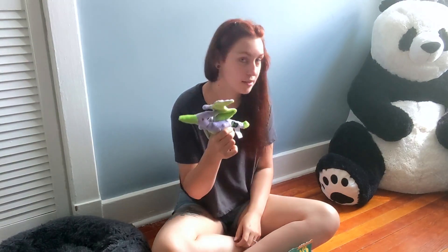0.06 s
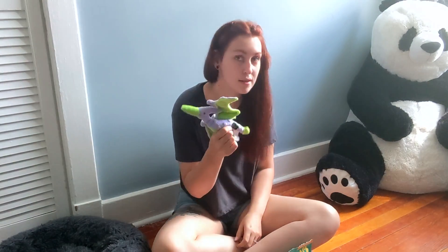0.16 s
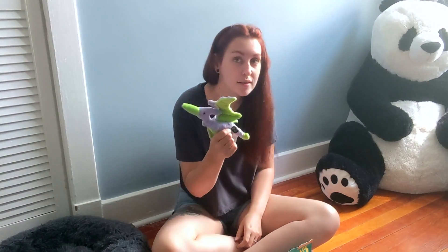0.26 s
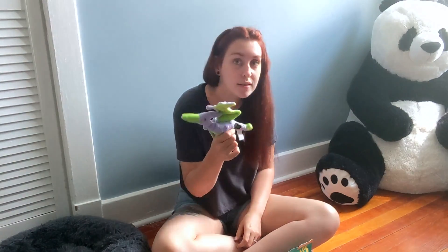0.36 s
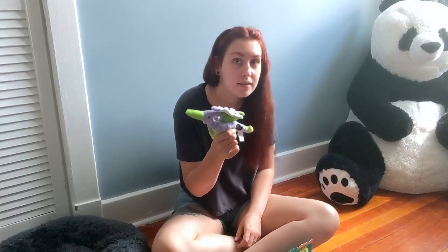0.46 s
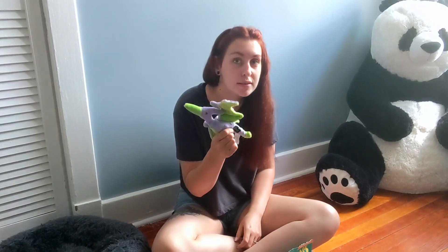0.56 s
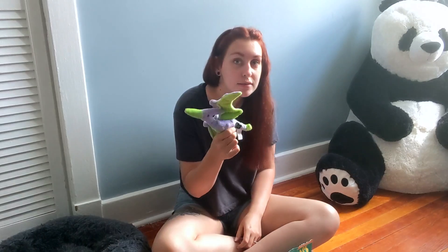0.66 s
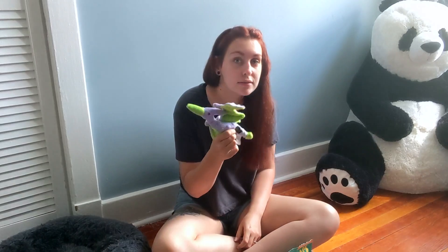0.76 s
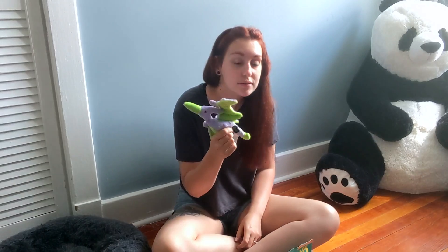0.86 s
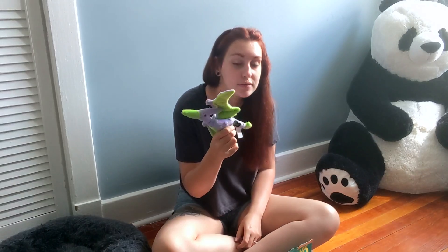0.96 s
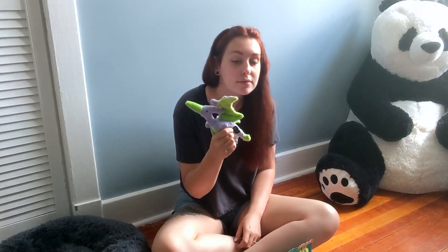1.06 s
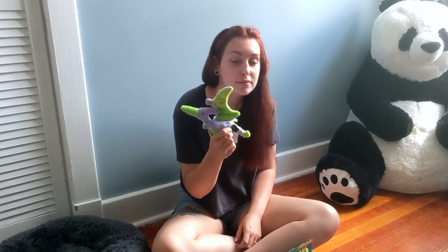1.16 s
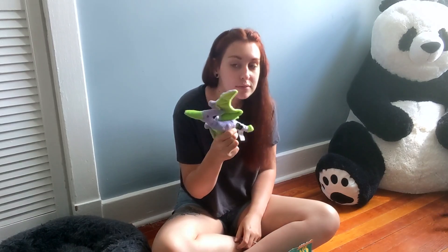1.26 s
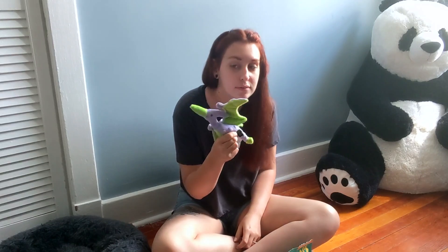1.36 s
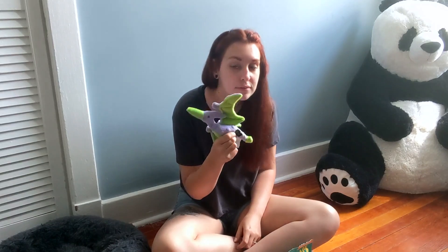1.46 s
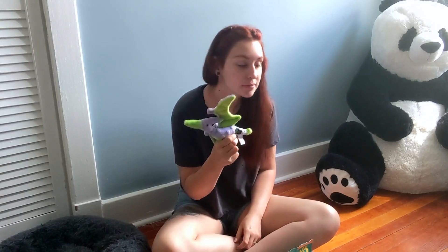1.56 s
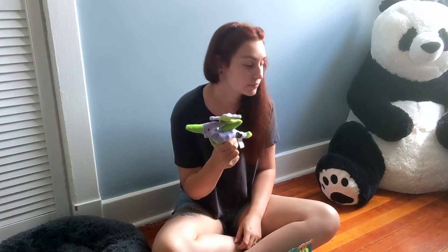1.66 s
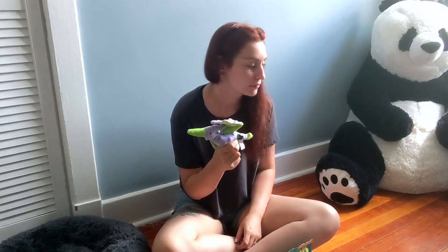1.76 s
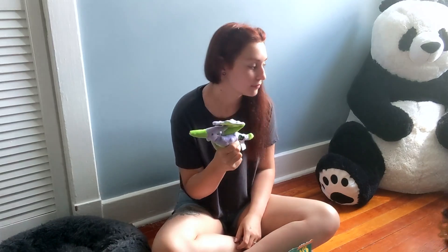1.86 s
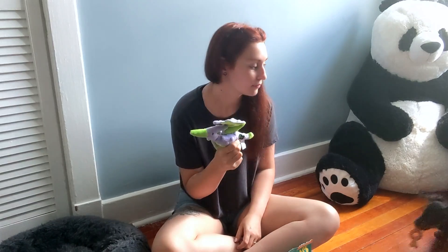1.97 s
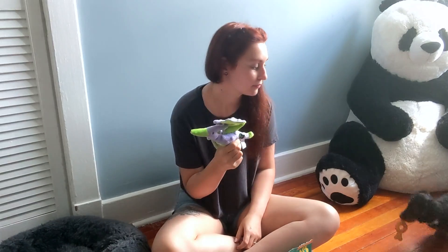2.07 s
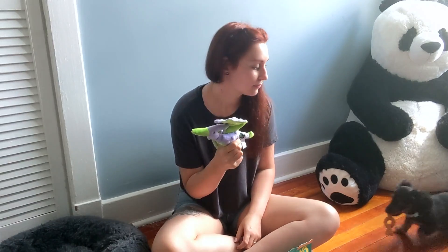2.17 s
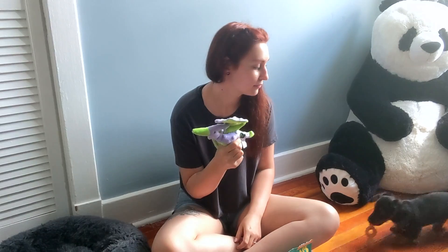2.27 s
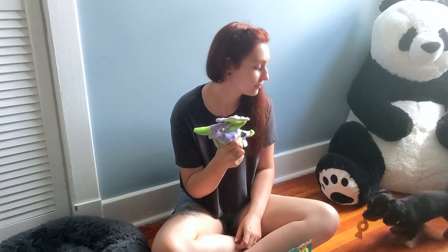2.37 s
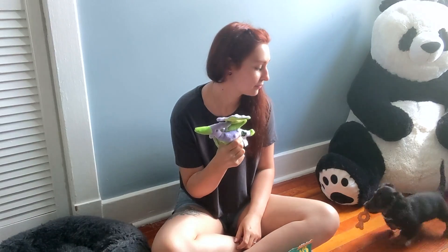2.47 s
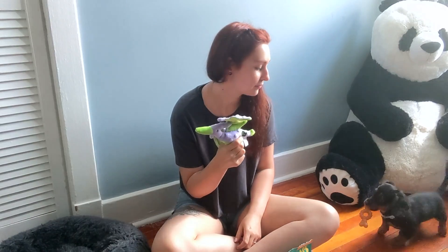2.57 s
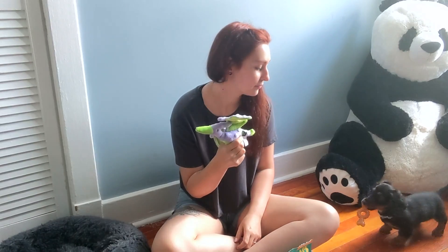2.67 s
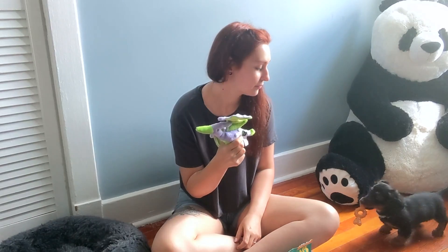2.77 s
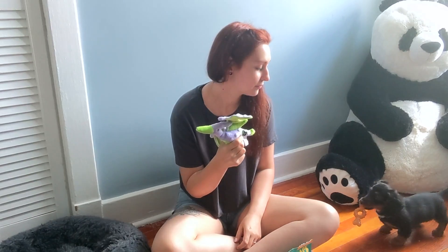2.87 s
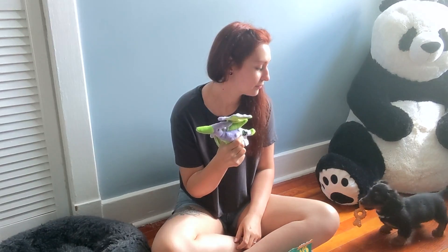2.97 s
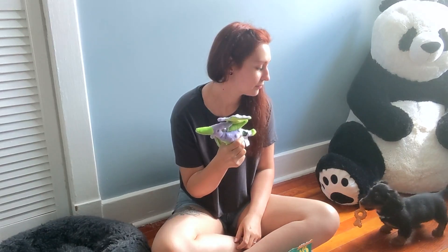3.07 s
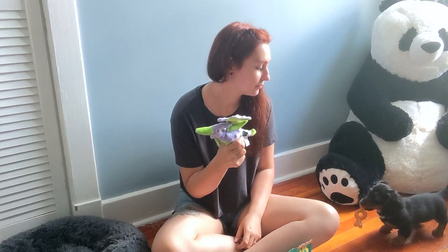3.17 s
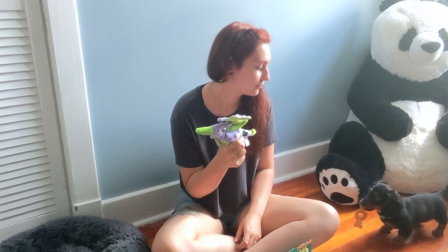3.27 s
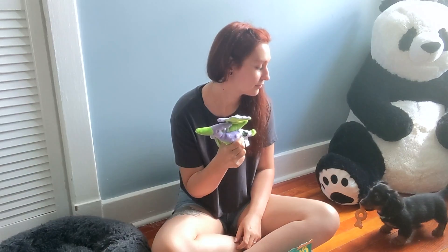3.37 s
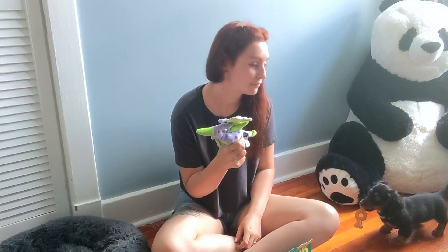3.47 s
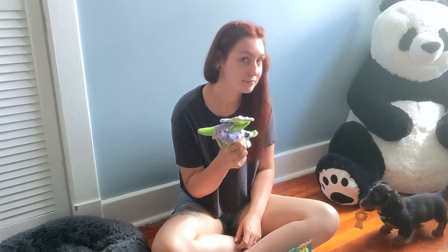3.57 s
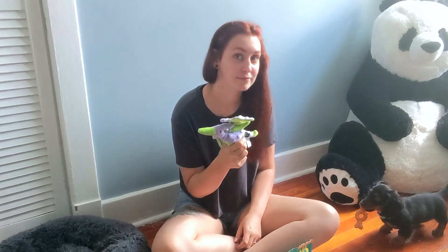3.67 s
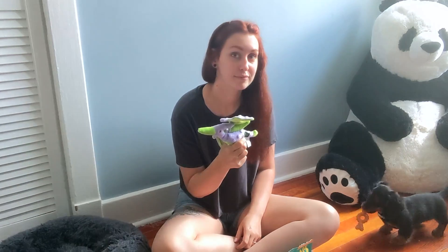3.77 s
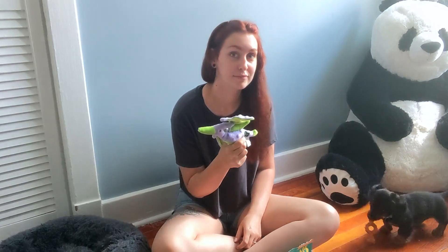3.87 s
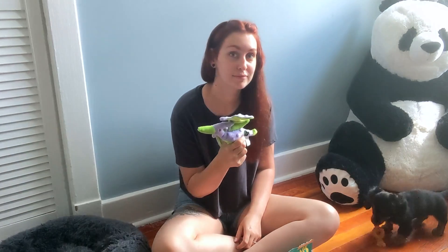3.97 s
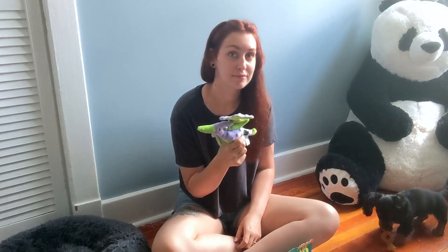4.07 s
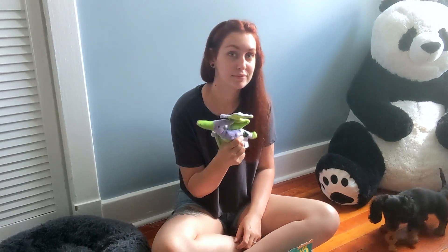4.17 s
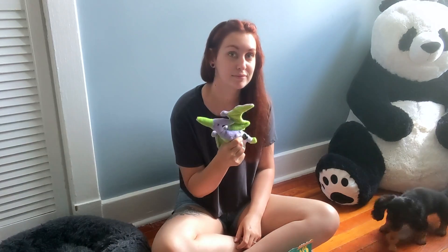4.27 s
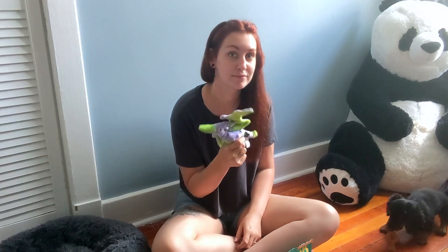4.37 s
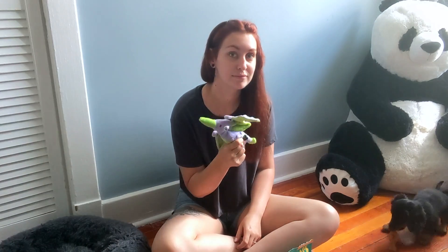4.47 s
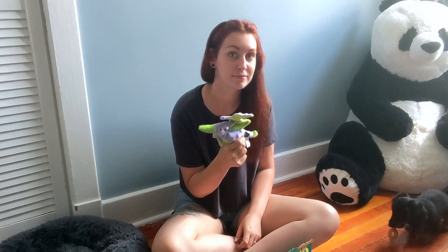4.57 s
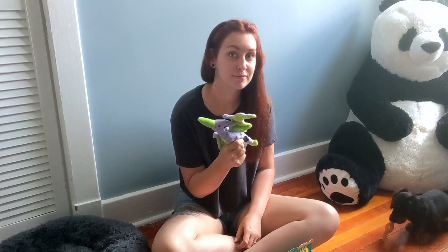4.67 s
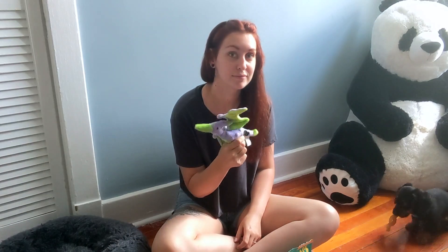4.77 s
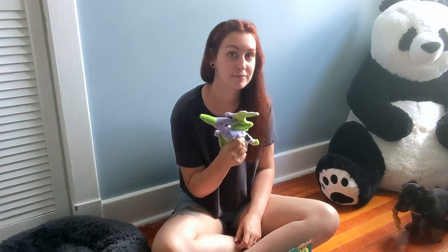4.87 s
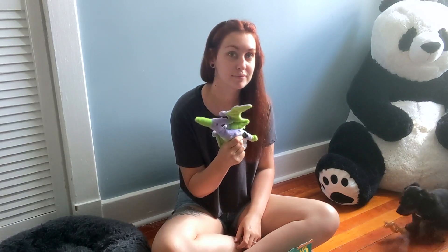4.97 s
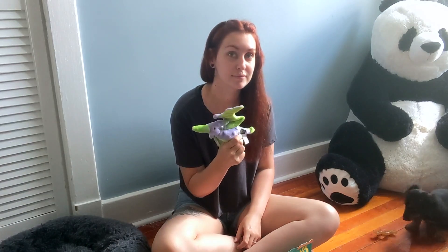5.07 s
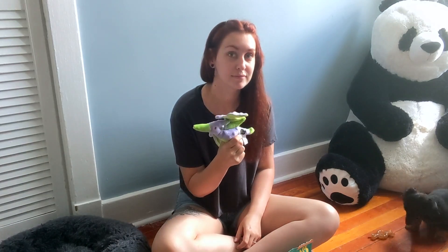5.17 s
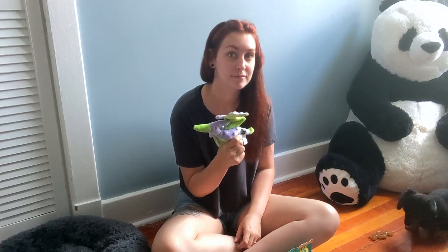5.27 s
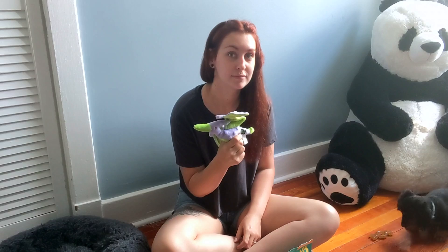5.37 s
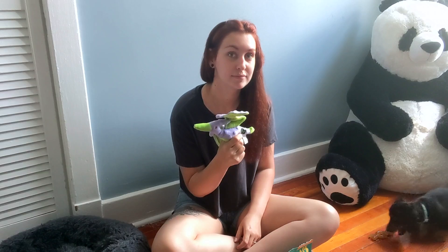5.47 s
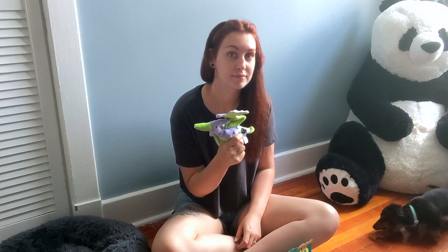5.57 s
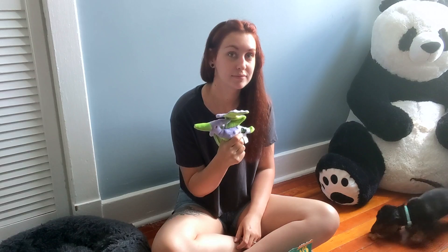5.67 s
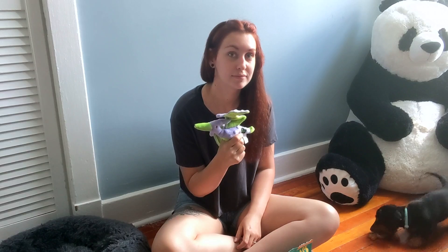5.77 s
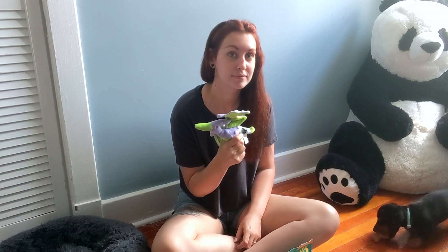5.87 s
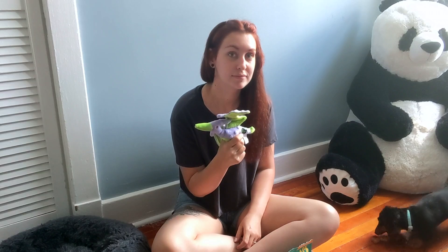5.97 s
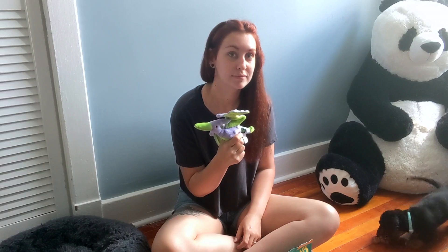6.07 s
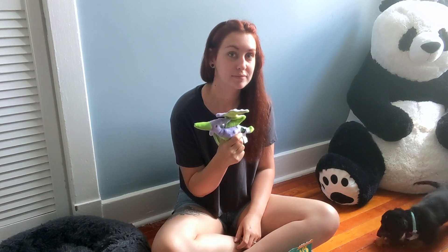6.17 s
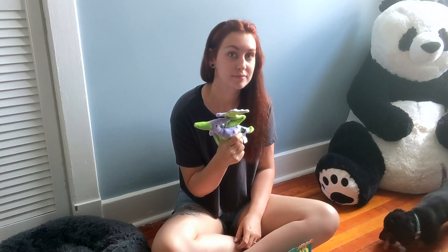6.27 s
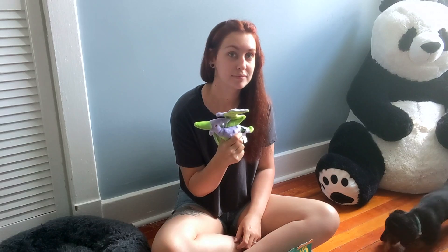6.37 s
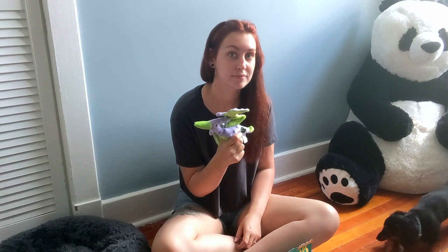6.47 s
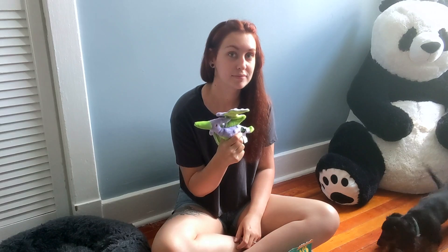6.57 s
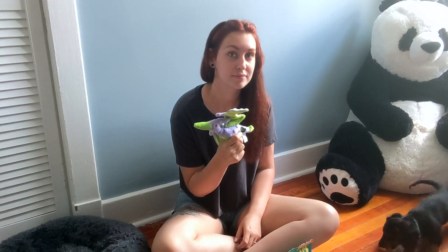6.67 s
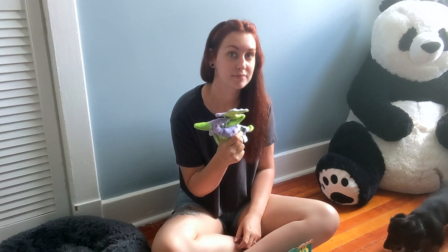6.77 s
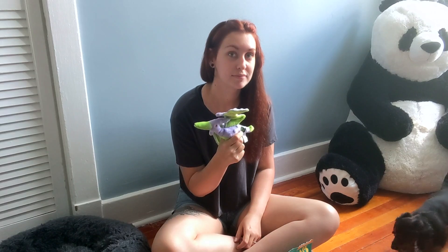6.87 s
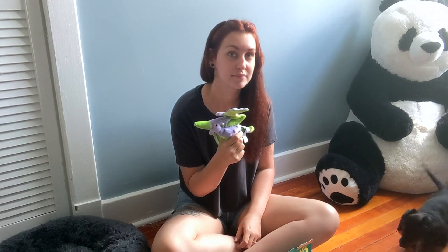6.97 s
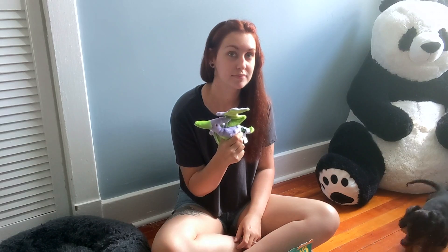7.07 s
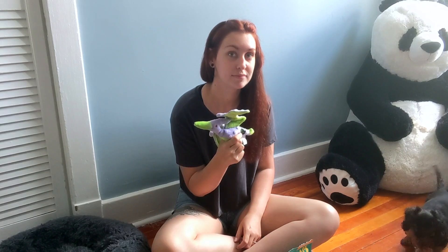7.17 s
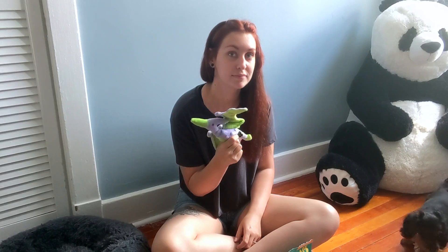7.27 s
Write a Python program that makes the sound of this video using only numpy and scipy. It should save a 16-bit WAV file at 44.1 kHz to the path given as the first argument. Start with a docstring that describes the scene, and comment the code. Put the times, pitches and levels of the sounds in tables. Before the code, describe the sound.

Short reedy squeaks from a squeezed toy, a pause with faint paw sounds, more squeaks, then hard chew toy knocks on a wooden floor indoors.

```python
"""A plush dog toy squeaks in quick runs, two metres from the microphone in a small room with a wooden floor.
Its reed squeaks high as the air is pressed out and lower as the bulb refills: wavering harmonics plus pulsed noise.
A small dog pads about and drops a hard chew toy: decaying modes of boards and toy, noise scrapes, collar clinks.
Behind lie a motor's hum, as wavering sines, and room rumble, as coloured noise.
Everything passes through two unlike microphone ports and the recorder's gain control, under which hum and rumble duck."""
import sys
import numpy as np
from scipy import signal
from scipy.fft import rfft, irfft, next_fast_len
from scipy.io import wavfile
from scipy.ndimage import uniform_filter1d

SR = 44100
rng = np.random.default_rng(int(sys.argv[2]) if len(sys.argv) > 2 else 0)


def to_wav(s):
    """Save 16-bit WAV."""
    ch = np.atleast_2d(s).T  # columns
    pcm = np.round(np.clip(ch, -1, 1) * 32767)  # PCM
    wavfile.write(sys.argv[1], SR, pcm.astype(np.int16))


N = 322371
T = np.arange(N) / SR  # seconds

# The hand presses air out of the toy. Each row: start in seconds, length in seconds, top pitch in Hz,
# relative level in dB.
SQUEEZES = [(.185, 0.055, 1233, -21.5), (.504, 0.062, 1265, -19), (.778, 0.06, 1262, -19.5),
            (1.045, 0.059, 1236, -19.5), (1.347, 0.055, 1181, -19.5), (4.199, .062, 1135, -22),
            (4.444, 0.052, 1218, -20), (4.662, 0.048, 1126, -20), (4.889, 0.054, 1121, -22),
            (7.280, 0.047, 1075, -25)]
# The bulb draws air back in. Each row: start in seconds, length in seconds, top pitch in Hz, relative level in dB.
REFILLS = [(.371, .053, 896, -30), (.664, 0.059, 875.3, -27.5), (.945, .054, 884, -26),
           (1.228, .063, 781, -33), (1.540, 0.05, 843, -26), (4.344, .044, 861.6, -25.5),
           (4.569, 0.038, 857, -25.5), (4.804, 0.037, 858.6, -24.5)]
# The reed's harmonics as they leave the plush on a squeeze. Each row: frequency in Hz, relative level in dB.
SQUEEZE_COLOUR = [(1100, -1.5), (2300, -10.5), (3400, -9), (4700, -8), (6200, -6.5), (8000, -6.5),
                  (8800, -1), (9800, 1.5), (11000, -10.5), (12500, -19.5), (15000, -24.5)]
# The same on a refill. Each row: frequency in Hz, relative level in dB.
REFILL_COLOUR = [(850, 3), (1700, 6), (2600, -0.5), (3500, -5), (5000, -7.5), (7600, -17), (8600, -4),
                 (9800, 4.5), (11400, -5.5), (12800, -12), (15000, -23.5)]
# Air rushing past the reed. Each row: frequency in Hz, relative level in dB.
AIR_COLOUR = [(400, -24), (1200, -6), (2500, 3), (5000, -7.5), (7500, -8), (9800, 13), (12500, -4.5)]
# Hard knocks of the chew toy on the boards. Each row: start in seconds, relative thud level in dB,
# relative clack level in dB.
KNOCKS = [(2.223, -35, -48), (4.115, -31.5, -43.5), (5.012, -14.5, -24), (5.091, -29, -26.5),
          (5.100, -5.5, -13), (5.154, -18, -17.5), (5.259, -20.5, -24.5), (5.314, -18.5, -24.5),
          (5.727, -29, -40.5), (6.001, -16.5, -25.5), (6.062, -25, -26.5), (6.220, -61, -40.5),
          (6.282, -30, -39.5), (6.536, -26, -33), (6.610, -33, -40.5)]
# Soft paws on the boards. Each row: start in seconds, relative level in dB.
PAWS = [(1.745, -32), (2.164, -29.5), (5.670, -24.5), (6.184, -25)]
# Floorboard modes. Each row: frequency in Hz, relative level in dB, time to fall 60 dB in seconds.
BOARDS = [(152, -7, .12), (172, -6, .12), (200, -4, .1), (228, 0, .12), (250, 1, .12), (290, -4, .09),
          (328, -1, .1), (375, -7, .07)]
# Chew toy modes. Each row: frequency in Hz, relative level in dB, time to fall 60 dB in seconds.
CHEW_TOY = [(463, -4.5, .064), (534, 3, .08), (615, 5.5, 0.049), (660, 11, 0.029), (803, 6, 0.082),
            (966, 0.5, .045), (1085, -2, 0.092), (1294, 5.5, 0.036), (1566, 1.5, 0.03), (1722, -4, 0.036)]
# Claws, fur and the chew toy scraping the floor. Each row: start in seconds, relative level in dB, centre in Hz.
SCUFFS = [(1.995, -47.5, 7500), (2.137, -46.5, 6800), (2.221, -46, 3620), (2.262, -46.5, 8050),
          (2.48, -53, 5400), (2.625, -58, 6030), (5.098, -34, 4000), (5.608, -54.5, 8830),
          (5.790, -53.5, 5860)]
# The collar's metal fittings clink. Each row: start in seconds, relative level in dB, base pitch in Hz.
CLINKS = [(2.209, -42.5, 5760), (6.532, -55, 6060), (6.599, -45, 5880)]
# A collar fitting's modes. Each row: ratio to the base pitch, relative level in dB, time to fall 60 dB in seconds.
FITTING = [(1.001, 1, 0.015), (1.05, -7, 0.014), (1.27, -10, .03), (1.48, -17, 0.019)]
# Partials of the motor hum. Each row: frequency in Hz, relative level in dB.
HUM = [(59.2, -45.5), (145.3, -60), (360.7, -65.5), (409.1, -69.5)]
# Spectrum of the room's rumble and hiss. Each row: frequency in Hz, relative level in dB per Hz.
RUMBLE = [(41, -23), (70, -4.5), (86, -10.5), (151, -7.5), (239, -14.5), (273, -21), (359, -23.5),
          (578, -28.5), (851, -30), (1170, -35), (1800, -37), (4000, -42.5), (8400, -49.5), (9900, -49),
          (13000, -55)]
# Near echoes from floor and walls. Each row: delay in seconds, level in dB relative to the tail.
ECHOES = [(.0047, -13.5), (.0088, -4), (0.0133, -4)]
# The room's ring. Each row: frequency in Hz, time to fall 60 dB in seconds.
ROOM_T60 = [(150, .36), (500, .3), (1000, .25), (2000, .27), (4000, .33), (10000, .31), (15000, .2)]
# The two microphone ports differ. Each row: frequency in Hz, left minus right level in dB.
PORTS = [(65, -3.4), (110, -2), (230, 0), (700, .5), (1400, -1.3), (3000, -1.8), (6000, -2.5), (8600, -7.5),
         (9800, -6.5), (11500, -2), (13500, 5)]

RUMBLE_DB = -48
TOP_HZ = 15950  # top of the reed's harmonics, the port hiss and the recorder
# A squeeze has fixed start and end pitches; one with a higher top takes longer to reach it.
PRESS_START_HZ, PRESS_END_HZ = 1072, 920
PRESS_LAG_S, PRESS_RISE_HZ_PER_S = 0.01185, 14100
# A refill starts and ends at shares of its top pitch, and always takes the same time to reach it.
DRAW_START_SHARE, DRAW_END_SHARE, DRAW_TOP_S = 0.96, .825, .025
SCUFF_DECAY_S = 0.016


def squeaker():
    """The hand drives the reed hard; the bulb's own spring draws the air back more gently."""
    pressed = reed(
        SQUEEZES, press_arch, SQUEEZE_COLOUR, second_db=5, attack_s=0.0033, close_s=0.0041, sag=0.54,
        fall_power=1.3, brighten=0.014, flick_hz=40.0, jitter=0.018, flutter_db=3.0, air_db=-9)
    drawn = reed(
        REFILLS, draw_arch, REFILL_COLOUR, second_db=0.5, attack_s=0.0021, close_s=0.005, sag=0.1,
        fall_power=2.0, brighten=0.11, flick_hz=150.8, jitter=0.016, flutter_db=2.0, air_db=-10)
    return pressed + drawn


def press_arch(top_hz):
    """Time to the top, start pitch and end pitch of a squeeze."""
    top_s = PRESS_LAG_S + max(top_hz - PRESS_START_HZ, 0) / PRESS_RISE_HZ_PER_S
    return top_s, PRESS_START_HZ, PRESS_END_HZ


def draw_arch(top_hz):
    """Time to the top, start pitch and end pitch of a refill."""
    return DRAW_TOP_S, DRAW_START_SHARE * top_hz, DRAW_END_SHARE * top_hz


def reed(strokes, arch, colour, second_db, attack_s, close_s, sag, fall_power, brighten, flick_hz,
         jitter, flutter_db, air_db):
    """A beating reed: pitch and brightness follow the air pressure, and air rasps through once a cycle."""
    out = np.zeros(N)
    t = T[:SR // 12]
    k = np.arange(1, 21)[:, None]  # harmonic numbers
    for start_s, length, top_hz, db in strokes:
        top_s, start_hz, end_hz = arch(top_hz)
        rise = np.clip(t / top_s, 0, 1)
        fall = np.clip((t - top_s) / (length - top_s), 0, 1)
        hz = start_hz + (top_hz - start_hz) * np.sin(np.pi / 2 * rise) ** 2
        hz = hz + (end_hz - top_hz) * fall ** fall_power
        # the free reed starts sharp, until it beats on its seat
        hz = hz + flick_hz * np.exp(-t / 0.0041)
        # it grows unsteady once it swings wide
        hz = hz * (1 + jitter * rise * wander(len(t), hz=400))
        phase = 2 * np.pi * np.cumsum(hz) / SR

        closing = np.clip((length - t) / close_s, 0, 1)
        swing = (1 - np.exp(-t / attack_s)) * (1 - sag * fall) * closing

        gain = undb(at(colour, k * hz) + second_db * (k == 2)) * (k * hz < TOP_HZ)
        # the harmonics flutter unevenly
        flutter = np.array([wander(len(t), hz=50) for _ in k])
        gain = gain * undb(flutter_db * flutter)
        gain = gain / np.sqrt(np.mean(np.sum(gain ** 2, 0)) / 2)

        # a wider swing shuts the reed harder, which feeds the high harmonics
        harmonic_swing = swing ** (1 + brighten * (k - 1))
        # the bulb's cavity spreads each beat out in time
        waves = np.cos(k * phase - np.pi * k ** 2 / 20)
        tone = np.sum(gain * harmonic_swing * waves, 0)

        puffs = rng.standard_normal(len(t)) * (1 + np.cos(phase))
        air = unit(shape(puffs, lambda f: undb(at(AIR_COLOUR, f))))
        add(out, start_s, undb(db) * (tone + undb(air_db) * air * swing * rise ** 2))
    return out


def knocks():
    """Paws and chew toy make the boards thud; each toy knock also rings the toy and rattles briefly."""
    out, t = np.zeros(N), T[:SR // 3]
    add_paws(out, t)
    for start_s, thud_db, clack_db in KNOCKS:
        thud = ring(BOARDS, t, scatter_db=2.0, detune=.025) * (1 - np.exp(-t / 0.0047))
        clack = ring(CHEW_TOY, t, scatter_db=1.5, detune=.05)
        # the blunt contact lasts long enough to weaken the treble above 1700 Hz
        rattle = unit(shape(rng.standard_normal(len(t)), lambda f: 1 / (1 + (f / 1700) ** 3)))
        rattle = rattle * np.exp(-t / .008)
        add(out, start_s, undb(thud_db) * thud + undb(clack_db) * (clack + undb(-3) * rattle))
    # the boards radiate little deep bass
    return signal.sosfilt(signal.butter(6, 138, "highpass", fs=SR, output="sos"), out)


def add_paws(out, t):
    """A soft paw presses for longer and chiefly reaches the lowest board modes."""
    give_s, corner_hz = 0.013, 205
    low_boards = [(hz, db - 10 * np.log10(1 + (hz / corner_hz) ** 6), t60) for hz, db, t60 in BOARDS]
    for start_s, db in PAWS:
        thud = ring(low_boards, t, scatter_db=6.0, detune=.025) * (1 - np.exp(-t / give_s))
        add(out, start_s, undb(db) * thud)


def scuffs():
    """Each short scrape is grainy noise spread broadly about its centre, with a quick rise and decay."""
    out, t = np.zeros(N), T[:SR // 5]
    octaves, grain_db, rise_s = 2.8, 4, 0.0004
    for start_s, db, hz in SCUFFS:
        grains = rng.standard_normal(len(t)) * undb(grain_db * wander(len(t), hz=300))
        scrape = unit(shape(grains, lambda f: 1 / (1 + (np.log2((f + 1) / hz) / octaves) ** 2)))
        envelope = np.exp(-t / SCUFF_DECAY_S) * (1 - np.exp(-t / rise_s))
        add(out, start_s, undb(db) * scrape * envelope)
    return out


def clinks():
    """Small metal fittings ring briefly in a few high modes."""
    out, t = np.zeros(N), T[:SR // 5]
    for start_s, db, hz in CLINKS:
        modes = [(hz * ratio, mode_db, t60) for ratio, mode_db, t60 in FITTING]
        add(out, start_s, undb(db) * ring(modes, t, scatter_db=5, detune=0.00067))
    return out


def ring(modes, t, scatter_db, detune):
    """Struck modes; each blow lands on another spot and shares its force differently."""
    hz, db, t60 = np.transpose(modes)[:, :, None]
    size, tune = rng.standard_normal((2, len(modes), 1))
    gain = undb(db + scatter_db * size)
    decay = np.exp(-np.log(1000) * t / t60)
    waves = gain * np.sin(2 * np.pi * hz * (1 + detune * tune) * t) * decay
    return waves.sum(0) / np.sqrt(np.sum(gain ** 2) / 2)


def background():
    """A motor hums somewhere in the house over the soft, steady rumble and hiss of the room."""
    hum = np.zeros(N)
    for hz, db in HUM:
        level = undb(db + 1.3 * wander(N, hz=4.3))
        phase = 2 * np.pi * hz * T + 0.44 * wander(N, hz=1.2)
        hum += level * np.sqrt(2) * np.sin(phase)
    # the bass rolls off below about 90 Hz
    air = shape(diffuse(N, alike_hz=900), lambda f: undb(at(RUMBLE, f)) * f ** 2 / (f ** 2 + 90 ** 2))
    return hum + undb(RUMBLE_DB) * unit(air)


def room(x, wet_db, gap_s, lead_s):
    """Direct sound, at the left port first by lead_s, near echoes, then a dense tail dying band by band."""
    t = T[:SR * 3 // 4]
    noise, tail = diffuse(len(t), alike_hz=870), 0
    centres = np.geomspace(125, 16000, 8)
    # each row of the identity picks out one band, fading into its neighbours
    for hz, own in zip(centres, np.eye(len(centres))):
        band = shape(noise, lambda f: at(np.c_[centres, own], f))
        tail = tail + band * np.exp(-np.log(1000) * t / at(ROOM_T60, hz))
    # silent for gap_s, then swelling over another gap_s
    tail = tail * np.clip(t / gap_s - 1, 0, 1)
    tail = tail / np.sqrt(np.sum(tail ** 2) / 2)
    for delay, db in ECHOES:
        # each echo comes from its own side
        arrivals = delay + .00015 * rng.standard_normal(2)
        tail[[0, 1], (arrivals * SR).astype(int)] += undb(db)
    direct = np.array([x, shape(x, lambda f: np.exp(-2j * np.pi * f * lead_s))])
    reverb = signal.fftconvolve(x[None], tail, axes=1)[:, :N]
    return (direct + undb(wet_db) * reverb) / np.sqrt(1 + undb(2 * wet_db))


def diffuse(n, alike_hz):
    """Noise from all sides at two ports: alike in the bass, unrelated in the treble."""
    mid, side = rng.standard_normal((2, n))

    def likeness(f):
        """Correlation of the two ports at f Hz."""
        return .92 / (1 + (f / alike_hz) ** 2)

    mid = shape(mid, lambda f: np.sqrt(1 + likeness(f)))
    side = shape(side, lambda f: np.sqrt(1 - likeness(f)))
    return np.array([mid + side, mid - side]) / np.sqrt(2)


def undb(db):
    """Decibels to gain."""
    return 10 ** (np.asarray(db) / 20)


def unit(x):
    """Scale to rms 1."""
    return x / np.sqrt(np.mean(x ** 2))


def at(points, hz):
    """Read (Hz, value) points on a log-frequency axis."""
    f, v = np.transpose(points)
    return np.interp(np.log(np.maximum(hz, 1)), np.log(f), v)


def shape(x, gain):
    """Filter by a gain that is a function of frequency."""
    n = x.shape[-1]
    size = next_fast_len(2 * n)
    return irfft(rfft(x, size) * gain(np.fft.rfftfreq(size, 1 / SR)), size)[..., :n]


def add(track, start_s, x):
    """Mix a sound into the track from start_s on."""
    i = int(start_s * SR)
    track[i:i + len(x)] += x[:max(N - i, 0)]


def wander(n, hz):
    """Smooth chance with rms 1, changing about hz times a second."""
    return unit(shape(rng.standard_normal(n), lambda f: 1 / (1 + (f / hz) ** 2)))


def scene():
    """The toy and the dog are both nearer the left port; the squeaks reverberate most, the floor knocks least."""
    toy = room(squeaker(), wet_db=4.5, gap_s=0.0011, lead_s=.00008)
    floor = room(undb(4.5) * knocks(), wet_db=-1.5, gap_s=0.0085, lead_s=.0001)
    dog = room(undb(8) * (scuffs() + clinks()), wet_db=3.0, gap_s=0.0024, lead_s=.00012)
    return undb(4.5) * toy + floor + dog + background()


def port_hiss(hiss_db, above_hz):
    """The left port has a faint high hiss of its own."""
    noise = rng.standard_normal(N)
    hiss = unit(shape(noise, lambda f: (f < TOP_HZ) / (1 + (above_hz / (f + 1000)) ** 12)))
    return np.array([[1], [0]]) * undb(hiss_db) * hiss


def gain_control(x, threshold_db=-24, slope=0.67, release_db_per_s=9, sense_s=0.026):
    """Average power above the threshold turns both ports down together; the gain creeps back up afterwards."""
    keep = np.exp(-1 / (sense_s * SR))
    power = signal.lfilter([1 - keep], [1, -keep], np.mean(x ** 2, 0))
    over = slope * np.maximum(10 * np.log10(power + 1e-12) - threshold_db, 0)
    # the cut in dB jumps up with the level and falls no faster than the release
    cut = np.maximum.accumulate(over + release_db_per_s * T) - release_db_per_s * T
    # centred smoothing gives a short look-ahead
    return x * undb(-uniform_filter1d(cut, size=400))


def record(dry):
    """Port colour and hiss, gain control and a steep top cut."""
    # half of the port difference goes to each side
    ports = shape(dry, lambda f: undb(np.array([[1], [-1]]) * at(PORTS, f) / 2))
    ports = ports + port_hiss(hiss_db=-64.5, above_hz=13000)
    top_cut = signal.ellip(10, .2, 80, TOP_HZ, fs=SR, output="sos")
    return signal.sosfilt(top_cut, gain_control(ports))


dry = scene()
out = record(dry)
to_wav(out)
```